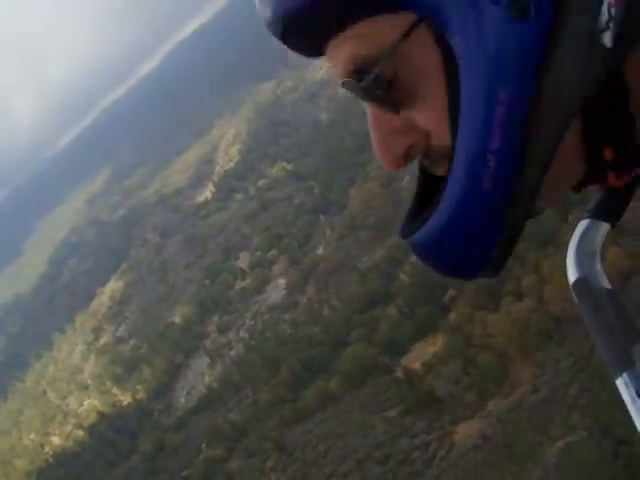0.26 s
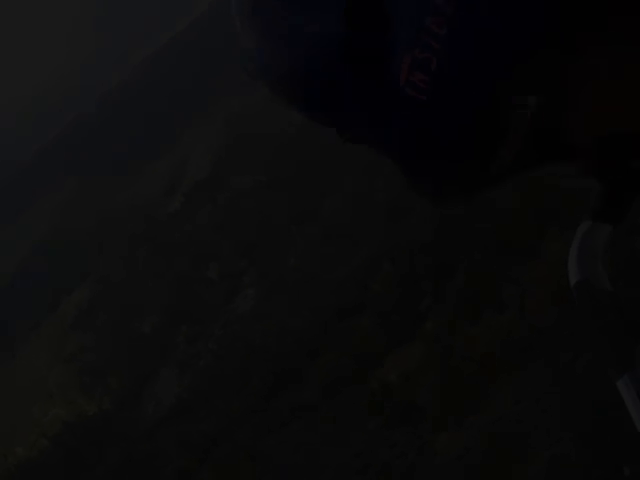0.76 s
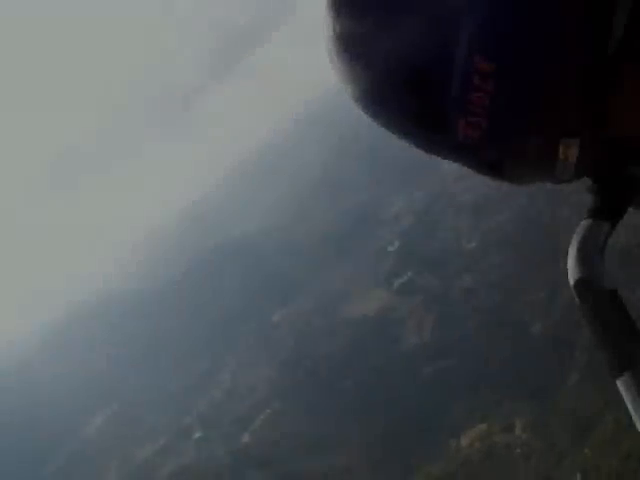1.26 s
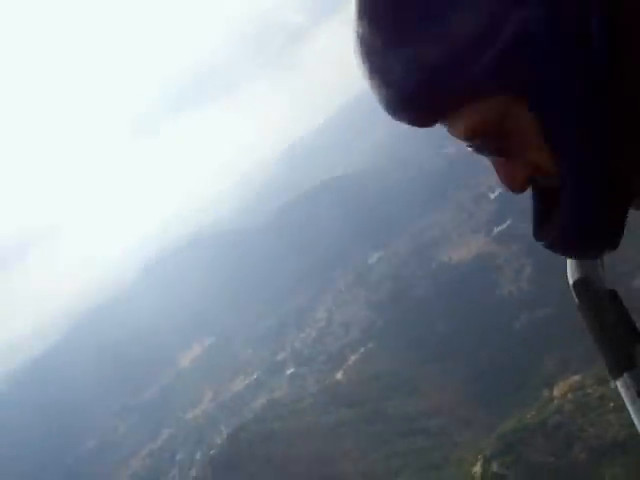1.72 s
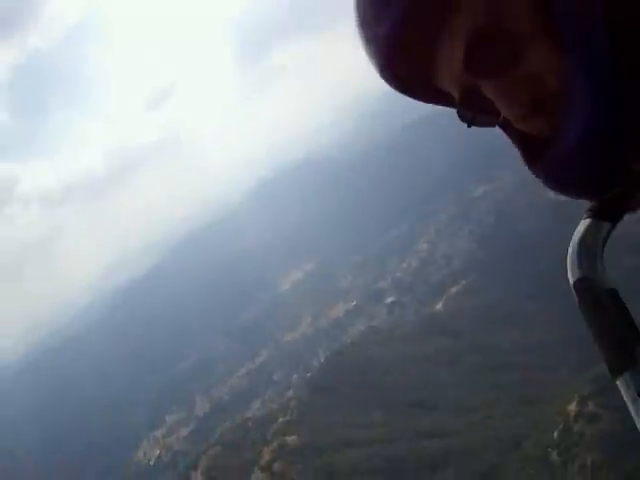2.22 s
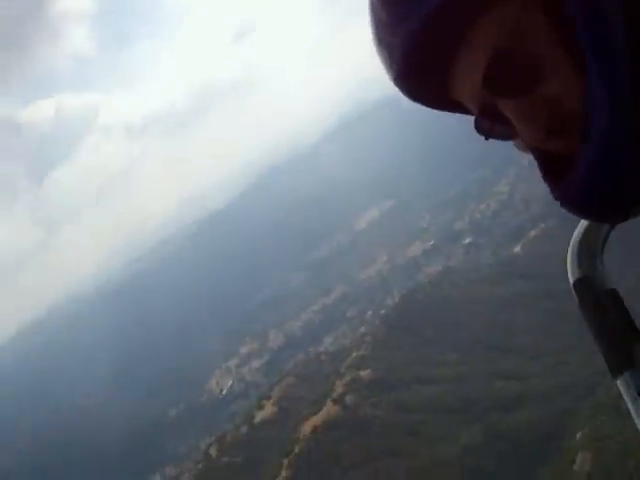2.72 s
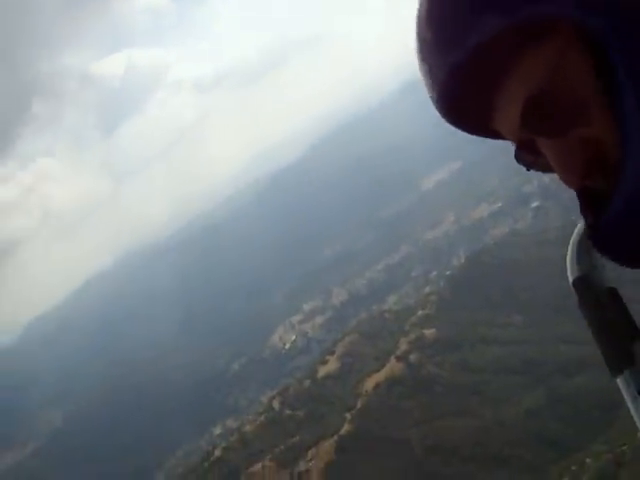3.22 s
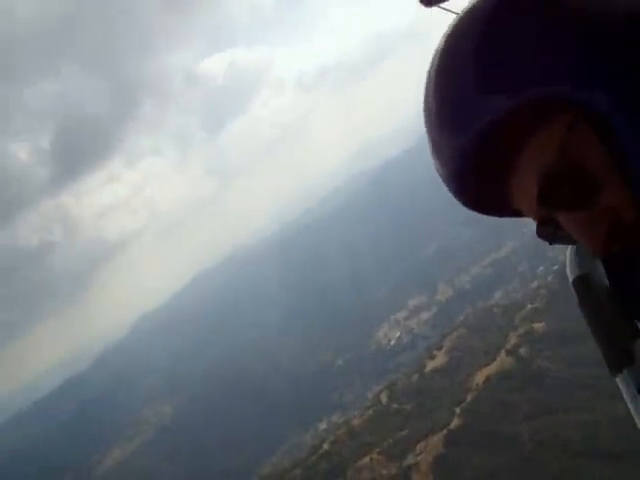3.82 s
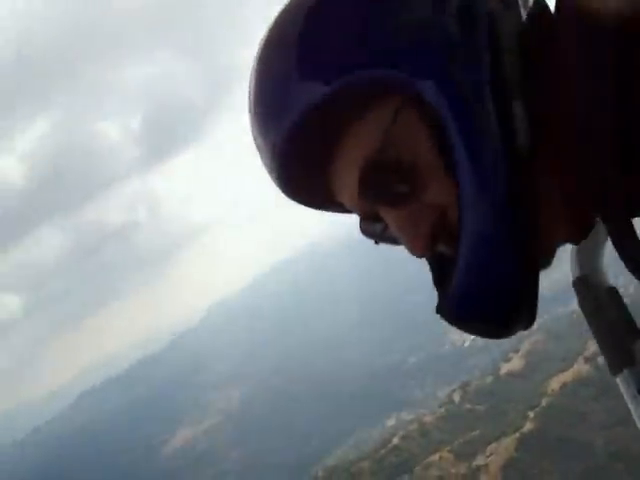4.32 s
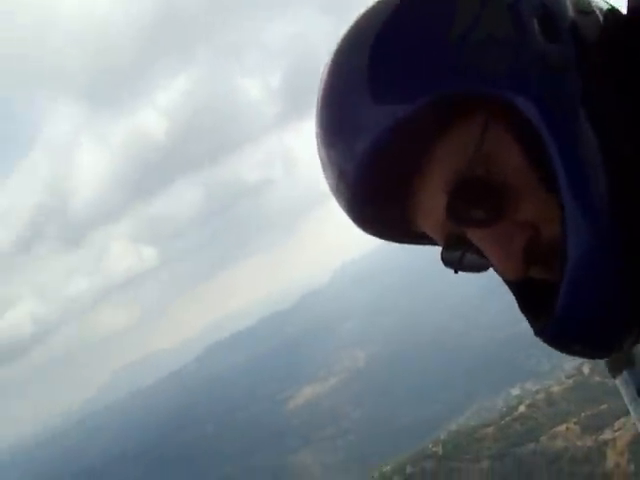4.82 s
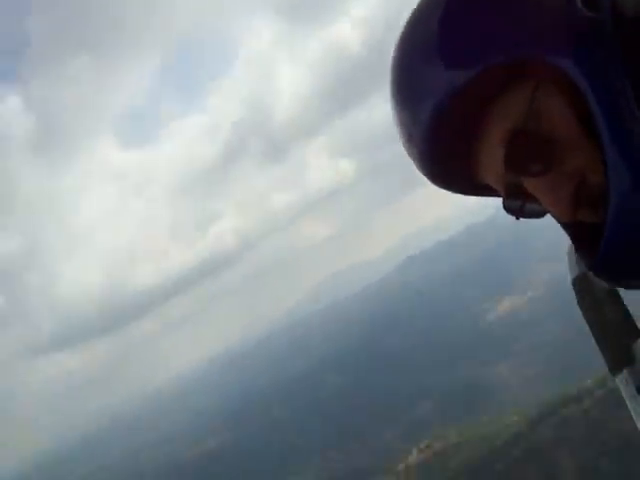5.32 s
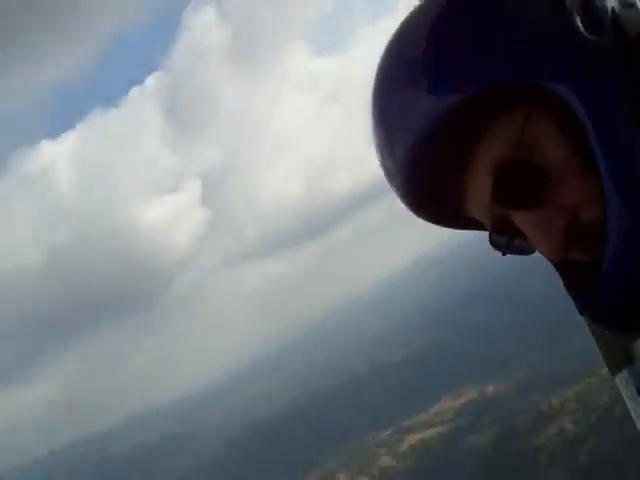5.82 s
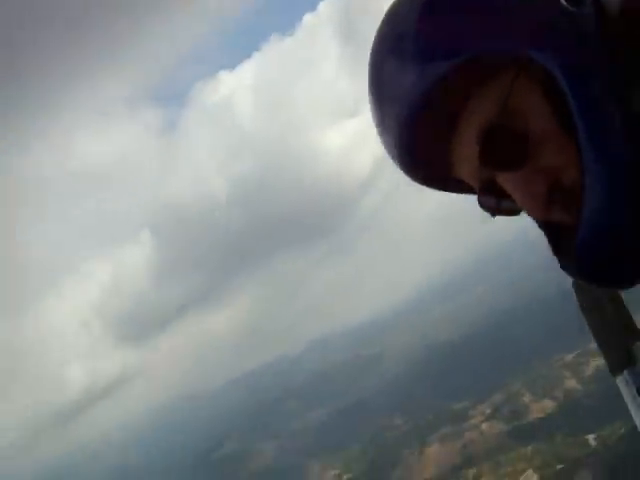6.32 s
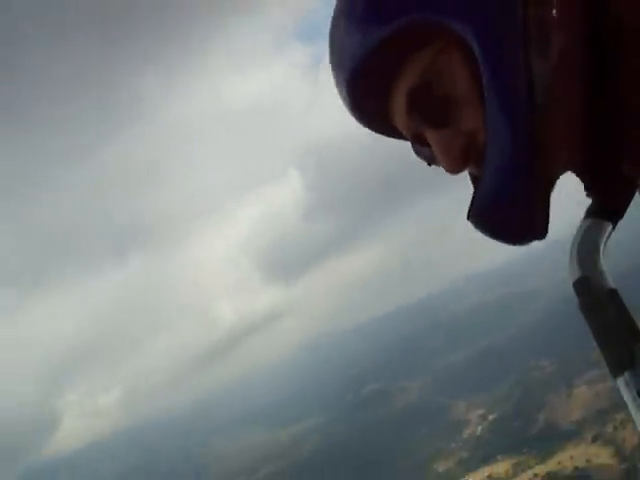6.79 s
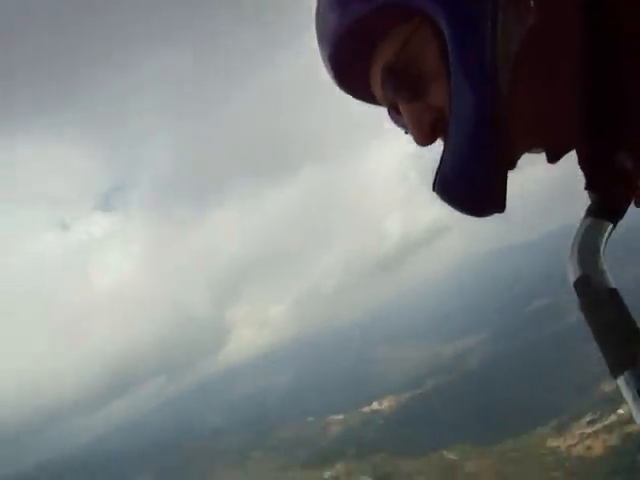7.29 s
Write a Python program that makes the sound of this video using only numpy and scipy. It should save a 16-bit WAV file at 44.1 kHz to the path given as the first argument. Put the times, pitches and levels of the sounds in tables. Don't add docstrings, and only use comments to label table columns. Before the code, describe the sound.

Close, exposed outdoor microphone in fast air, no shelter and no echo. Unsteady rumble and hiss surge from gust to gust. Sharp plastic-like knocks cluster at the start and recur until about four seconds. From then on, pressure bumps repeatedly chop the volume, which climbs back within a fraction of a second. The wind grows stronger, with short hollow rattles near the end and a faint thin electronic whine.

```python
import sys
import numpy as np
from scipy import signal
from scipy.fft import rfft, irfft, next_fast_len
from scipy.io import wavfile
from scipy.ndimage import uniform_filter1d, map_coordinates

SR = 44100
rng = np.random.default_rng(int(sys.argv[2]) if len(sys.argv) > 2 else 0)


def invert_db(x):
    u = np.asarray(x, float) / 20
    return 10 ** u


def transcribe(u):
    v = np.clip(np.atleast_2d(u).T, -1, 1)
    q = np.round(v * 32767).astype(np.int16)
    wavfile.write(sys.argv[1], SR, q)


N = 332955


def unit(x):
    return x / np.sqrt(np.mean(x ** 2) + 1e-20)


def wobble(rate):
    knots = rng.standard_normal(int(N * rate / SR) + 4)
    return map_coordinates(knots, [np.arange(N) * rate / SR])


def filtered(x, response):
    size = next_fast_len(N + 8192)
    spectrum = rfft(x, size) * response(np.fft.rfftfreq(size, 1 / SR))
    return irfft(spectrum, size)[:N]


def coloured(x, spectrum):
    f, db = np.transpose(spectrum)
    return unit(filtered(x, lambda hz: invert_db(np.interp(np.log(hz + 1), np.log(f + 1), db))))


def patchy(depth_db):
    z = signal.stft(rng.standard_normal(N + 512), nperseg=512)[2]
    field = uniform_filter1d(rng.standard_normal(z.shape), size=6, axis=0)
    field = uniform_filter1d(field, size=8, axis=1)
    noise = signal.istft(z * invert_db(depth_db * unit(field)), nperseg=512)[1]
    return unit(noise[:N])


def eddies(rate, spread_db):
    chance, sign, size = rng.random((3, N))
    strength = invert_db(-spread_db * np.log(size + 1e-9))
    return unit((chance < rate / SR) * np.sign(sign - .5) * strength)


# f/Hz, level/dB
CONVERTER_TONES = [(11025, -70), (12403, -92), (13781, -96), (15159, -101)]


def high_tones():
    t = np.arange(N) / SR
    (edge_hz, edge_db), *upper = CONVERTER_TONES
    out = invert_db(edge_db - 1.5) * (0.43 + 0.59 * wobble(70)) * np.sin(2 * np.pi * edge_hz * t)
    for k, (hz, db) in enumerate(upper):
        on = np.clip(4 * (wobble(22) + 1.9 - .7 * k - .16 * t), 0, 1)
        out = out + invert_db(db + 4.5) * on * np.sin(2 * np.pi * hz * t)
    return out


# t/s, level/dB
SLIPPED_SAMPLE = (.9867, -23)


def slip():
    at, db = SLIPPED_SAMPLE
    return invert_db(db) * (np.arange(N) == round(at * SR))


# f/Hz, level/dB
WHINE_TONES = [(8080, -53)]


def whine():
    t = np.arange(N) / SR
    return sum(invert_db(db + 3) * np.sin(2 * np.pi * hz * t) for hz, db in WHINE_TONES)


# start t/s, end t/s, level/dB
RATTLE_SPANS = [
    (6.291, 6.368, -19),
    (6.712, 6.747, -22),
]
# f/Hz, level/dB
HOUSING_COLOUR = [(350, -30), (560, -3), (650, 10), (780, -14), (1050, 3), (1250, -11), (1600, -34),
                  (2400, -20), (4000, -52)]


def rattle():
    t = np.arange(N) / SR
    shaking = 0
    for start, end, db in RATTLE_SPANS:
        fade = np.clip(np.minimum(t - start, end - t) / 0.008, 0, 1)
        shaking = shaking + invert_db(db) * fade
    return shaking * coloured(eddies(rate=2000, spread_db=-1.0), HOUSING_COLOUR)


# t/s, peak level/dB, ring f/Hz
FITTING_KNOCKS = [(0.286, -10, 1054), (0.292, -6.5, 1020), (0.352, -15, 1000), (0.4136, -7.5, 947),
                  (0.458, -12.5, 950), (0.461, -11, 940), (1.5402, -7, 1000), (1.591, -14, 970),
                  (1.912, -7.5, 1050), (2.506, -9, 1036), (2.513, -8, 960), (2.537, -9, 1023),
                  (2.541, -12, 1095), (2.84, -8.5, 1030), (2.874, -18, 920), (3.312, -14, 930),
                  (3.345, -9, 940), (3.746, -11, 910), (3.915, -13, 1150), (4.08, -10.5, 1025)]
# f/Hz, level/dB
TICK_COLOUR = [(300, -33), (1500, 0), (3000, 3), (5000, -11), (7000, -2.5), (9000, -20), (11000, -25)]


def knocks():
    rings, ticks, t = np.zeros(N + SR), np.zeros(N), np.arange(SR // 20) / SR
    damped_at = 0.0075
    for s, db, hz in FITTING_KNOCKS:
        tick = invert_db(-30 + 0.88 * (db + 12))
        modes = np.sin(2 * np.pi * hz * t) + 0.37 * np.sin(2 * np.pi * 1.134 * hz * t)
        ring = modes * invert_db(-60 * t / 0.057) * (1 - np.exp(-t / 0.00065))
        damped = 1 / (1 + np.exp((t - damped_at) / 0.0012))
        rings[round(s * SR):][:len(t)] += invert_db(db - 1.5) * ring * damped
        ticks[round(s * SR)] += tick
        ticks[round((s + 3.5 / hz) * SR)] -= 1.2 * tick
    return rings[:N] + invert_db(-52.5) * coloured(ticks, TICK_COLOUR)


# t/s, airspeed level/dB, turbulence level/dB, squareness to the cavity level/dB
AIRFLOW = [(0, 2, 3.5, -5), (.3, -.5, 2, 2.5), (.65, -2, 3, -1.5), (1.14, -1.5, -1, 0.5),
           (1.28, -1.3, 0.5, -8), (1.46, -0.5, -2.5, 0), (2.2, -1.7, -2.5, -2.5), (2.65, -.5, -1, -3.5),
           (2.95, .5, -3, -2), (3.5, -0.5, -2, -1.5), (3.8, 1.3, 0.5, 3), (4.25, -0.3, 0.5, -4),
           (4.55, 2, 2, -0.5), (5.0, 3, 1, 2), (6.05, 3.5, 1.5, 1), (6.35, 1, 1, 3.5), (6.85, 3.5, 3.5, 3),
           (7.55, -0.5, -2, 3)]
# t/s, strength level/dB, half length/s, share reaching the treble/0-1
GUST_LUMPS = [(0.117, -4.5, 0.088, 0.4), (.25, 0.5, 0.072, 0), (.63, -1.5, .06, 0.2), (1.127, 1, .06, .8),
              (1.268, -1.5, .09, 1), (1.52, -3.5, 0.043, 0), (1.756, 1, 0.067, 0.3),
              (2.411, 7, 0.097, 0.57), (2.527, 6, 0.039, 0.44), (3.284, 2.5, 0.095, 0.4),
              (3.764, 3.5, 0.1, 0), (4.26, 6, .1, 0), (4.66, 3.5, 0.065, 0.17), (4.78, -2, 0.075, 0.8),
              (5.158, 2, 0.093, 0), (5.417, 5.5, 0.1, 0.42), (5.662, 1, .06, .05), (5.912, 2.5, 0.1, 0),
              (6.162, 3.5, 0.1, 0.4), (6.543, -0.5, .06, .3), (6.905, 2.5, 0.11, 0.5),
              (7.083, -3, .1, 0.24), (7.435, 3.5, 0.06, 1), (2.864, 2.5, .06, 0.6), (4.45, 3, 0.047, 0),
              (6.41, 2.5, 0.029, 0.1), (7.334, 0.5, 0.03, 0.2), (3.95, 1, .06, .5)]


def airflow():
    t = np.arange(0, N / SR + .002, .001)
    s, *controls = np.transpose(AIRFLOW)
    speed_db, stirred_db, across_db = [np.interp(t, s, c) for c in controls]
    gust_db, fast_db = 0, speed_db
    for at, db, half, bright in GUST_LUMPS:
        lump = db * np.exp(-((t - at) / half) ** 2)
        gust_db = gust_db + lump
        fast_db = fast_db + bright * lump
    push_db = 0
    for at, cut_db, _ in PRESSURE_SURGES:
        push_db = push_db - cut_db * (t > at) * np.exp(-np.abs(t - at) / 0.019)
    buffet_db = -20 + stirred_db + gust_db + .17 * push_db
    roar_db = -21 + 0.54 * fast_db + 0.14 * stirred_db + 0.33 * gust_db + 0.056 * push_db
    hiss_db = -33 + fast_db
    cavity_db = -44.5 + 1.52 * fast_db + across_db + 0.04 * push_db
    levels = buffet_db, roar_db, hiss_db, cavity_db
    return [np.interp(np.arange(N) / SR, t, db) for db in levels]


# f/Hz, level/dB
SWAY_COLOUR = [(8, -35), (15, -1), (40, -1), (70, 2), (110, -14.5), (200, -72)]
BUFFET_COLOUR = [(20, -32), (55, -9.5), (93, 0.5), (160, 1), (330, -11.5), (430, -23.5), (730, -80)]
ROAR_COLOUR = [(160, -12), (270, -2.5), (921, -9), (1500, -27.5), (1950, -38), (3300, -120)]
HISS_COLOUR = [(790, -18.5), (1350, -1.5), (1520, -5.5), (3200, -8.5), (4730, -13), (5700, -20),
               (7400, -28), (8400, -37), (9800, -34), (10650, -49), (10950, -46.5)]
CAVITY_COLOUR = [(3200, -22), (5300, -8), (5900, -5), (6500, 1.5), (7050, -1), (7600, -7), (8300, -14),
                 (10500, -27.5)]


def wind():
    buffet_db, roar_db, hiss_db, cavity_db = airflow()
    bursts = eddies(rate=900, spread_db=1.43)
    flutter = 0.83 * wobble(9) + 1.08 * wobble(45)
    buffet = coloured(patchy(0.26) + 0.65 * bursts, BUFFET_COLOUR)
    buffet = buffet * invert_db(1.55 * flutter + 0.37 * wobble(14))
    roar = coloured(patchy(1.0) + 0.55 * bursts, ROAR_COLOUR)
    roar = roar * invert_db(0.48 * flutter + 0.45 * wobble(30))
    hiss = coloured(patchy(1.3) + 0.33 * bursts, HISS_COLOUR)
    hiss = hiss * invert_db(0.44 * flutter + 0.36 * wobble(90))
    cavity = coloured(patchy(2.8) + 0.89 * bursts, CAVITY_COLOUR)
    cavity = cavity * invert_db(0.5 * flutter + 1.25 * wobble(120))
    buffet = np.tanh(unit(buffet) / 3.5)
    sway = coloured(patchy(1.6) + .5 * bursts, SWAY_COLOUR) * invert_db(0.53 * flutter)
    layers = [(sway, -25.5), (buffet, buffet_db), (roar, roar_db), (hiss, hiss_db), (cavity, cavity_db)]
    return sum(unit(x) * invert_db(db) for x, db in layers)


# t/s, gain after the cut level/dB, signed pressure step
PRESSURE_SURGES = [(0.2145, -11.5, 0.7), (0.5854, -5, -0.18), (0.6713, -4.5, 0.55), (2.3562, -17, 0.68),
                   (3.5148, -13.5, -0.86), (3.7748, -11, 0.38), (4.2635, -4.5, -0.96), (4.3982, -7.5, 0.91),
                   (4.4791, -15.5, 0.47), (4.7293, -5, -0.46), (4.818, -16.5, 0.63), (5.0084, -8, 0.61),
                   (5.199, -6.5, -0.92), (5.3338, -12.5, -1.06), (5.4917, -6, -0.74), (5.6778, -15, 0.28),
                   (5.961, -14.5, -0.88), (6.4317, -15.5, 0.75), (6.6049, -15, 0.58), (6.754, -15.5, 0.62),
                   (6.9486, -13, -0.6), (7.1127, -13, 0.65), (7.4535, -5, -0.54)]


def surges():
    t, out = np.arange(N) / SR, np.zeros(N)
    for s, cut_db, step in PRESSURE_SURGES:
        edge_ms = .021 if step > 0 and cut_db < -12 else .12
        near = slice(round((s - .06) * SR), round((s + .04) * SR))
        u = t[near] - s
        before = .5 - .5 * np.tanh(500 * u / edge_ms)
        swell = np.exp(-np.abs(u) / 0.0032)
        out[near] -= 1.27 * step * swell * (before + 0.42 * invert_db(cut_db) * (1 - before))
    return filtered(out, lambda hz: 1j * hz / (55 + 1j * hz))


def gain_control():
    gain_db = np.zeros(N)
    for s, cut_db, _ in PRESSURE_SURGES:
        since = np.arange(N - round(s * SR))[:SR // 2] / SR
        climb = np.clip(1 + 80 * since / cut_db, 0, 1) ** 1.51
        gain_db[round(s * SR):][:len(since)] = cut_db * climb
    return uniform_filter1d(invert_db(gain_db), size=15)


# t/s, length/s, lower edge f/Hz
STARVED_SPANS = [(2.359, .019, 5200), (3.518, .007, 5500), (3.775, .004, 6000), (4.482, .012, 6900),
                 (4.825, 0.013, 6460), (5.681, .012, 6860), (5.966, .012, 8500), (6.436, .013, 7500),
                 (6.608, .004, 7000), (6.758, 0.0066, 6500), (6.956, 0.0084, 7500), (7.116, .013, 5800)]


def starved(x):
    out, reach = x.copy(), SR // 20
    t = np.arange(reach) / SR
    for s, length, edge_hz in STARVED_SPANS:
        start = round(s * SR)
        high_pass = signal.butter(10, min(edge_hz, 10000), 'high', fs=SR, output='sos')
        top = signal.sosfiltfilt(high_pass, x[start - reach:start + reach])[reach:]
        fade = np.clip(np.minimum(t, length - t) / 0.0009, 0, 1)
        out[start:start + reach] -= fade * top
    return out


def scene():
    return (wind() + knocks() + rattle() + whine())[None]


def top_cut(x):
    return signal.sosfilt(signal.butter(12, 15800, fs=SR, output="sos"), x)


def record(dry):
    x = dry[0] * gain_control() + surges()
    x = x / (1 + np.abs(x / 1.5) ** 4) ** 0.23
    x = starved(filtered(x, lambda hz: hz < 10990))
    x = x + high_tones() + slip()
    return top_cut(x[None])


dry = scene()
out = record(dry)
transcribe(out)
```